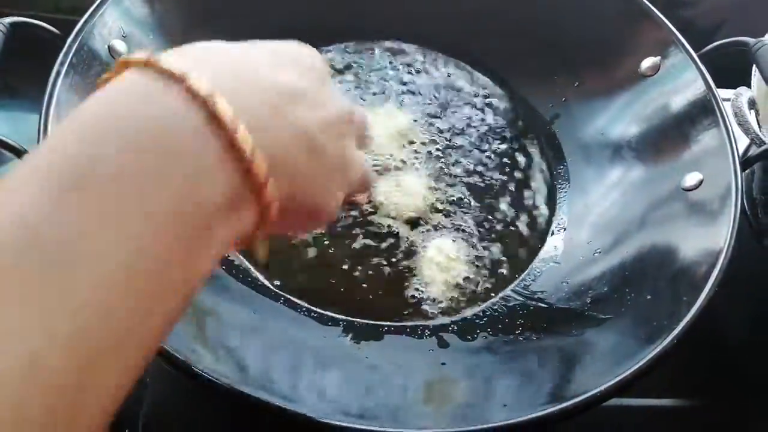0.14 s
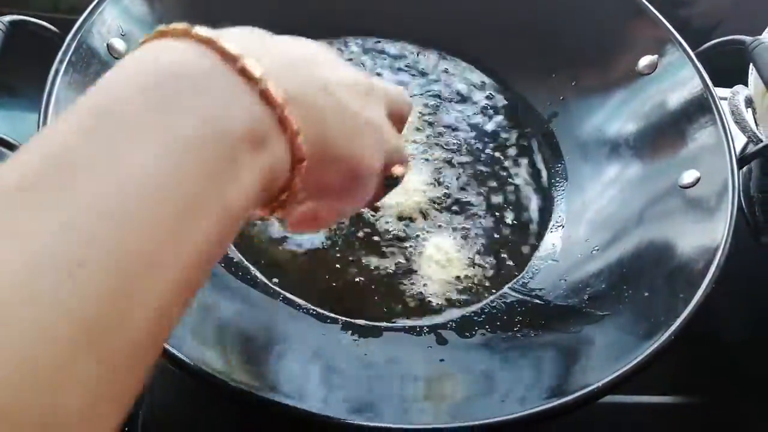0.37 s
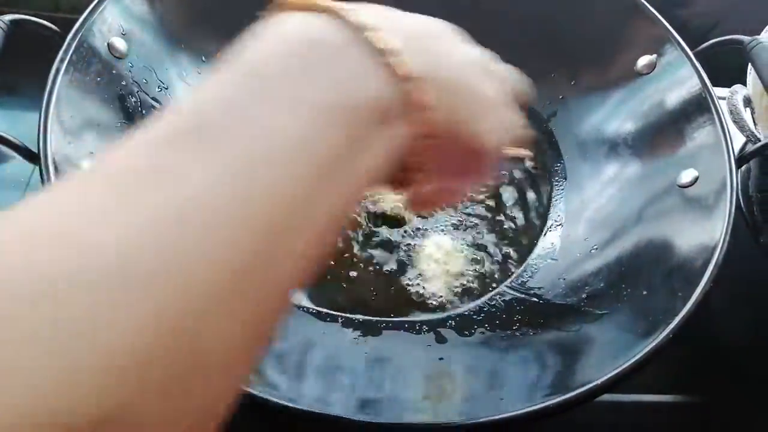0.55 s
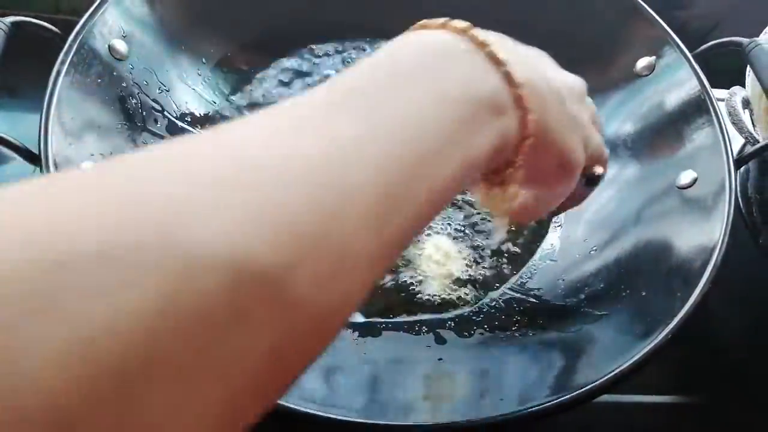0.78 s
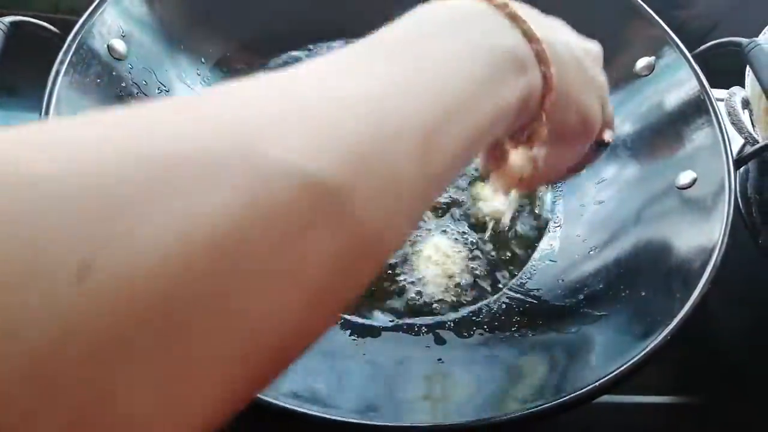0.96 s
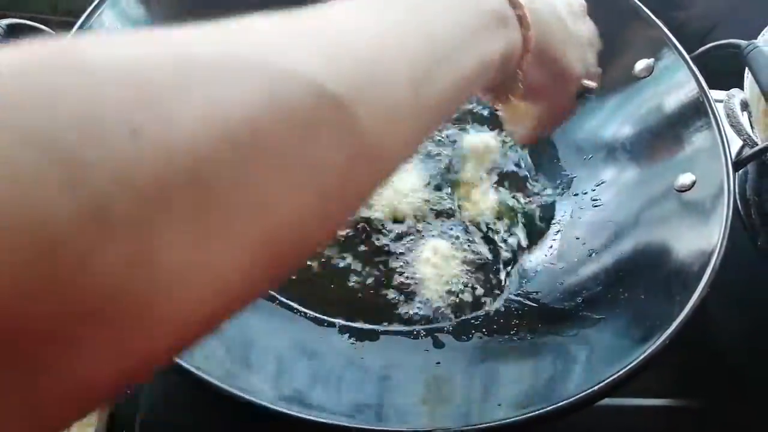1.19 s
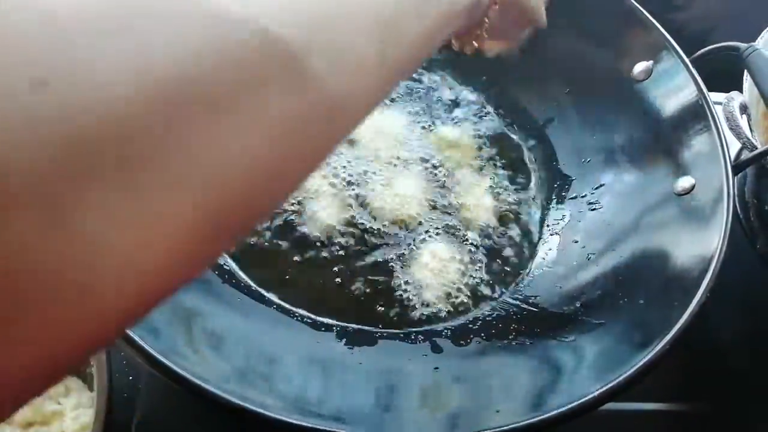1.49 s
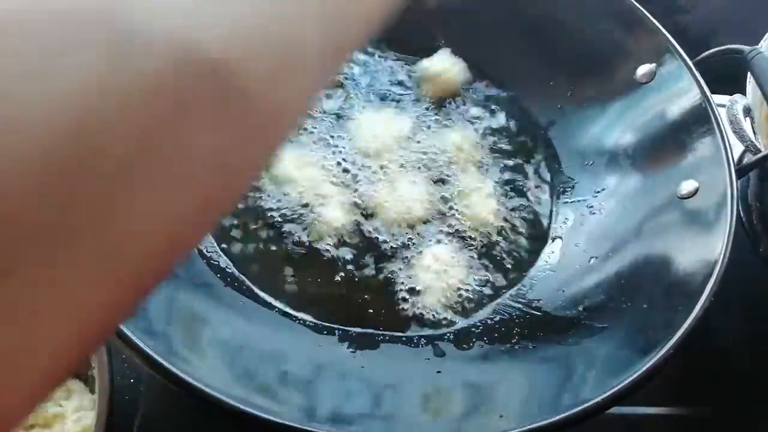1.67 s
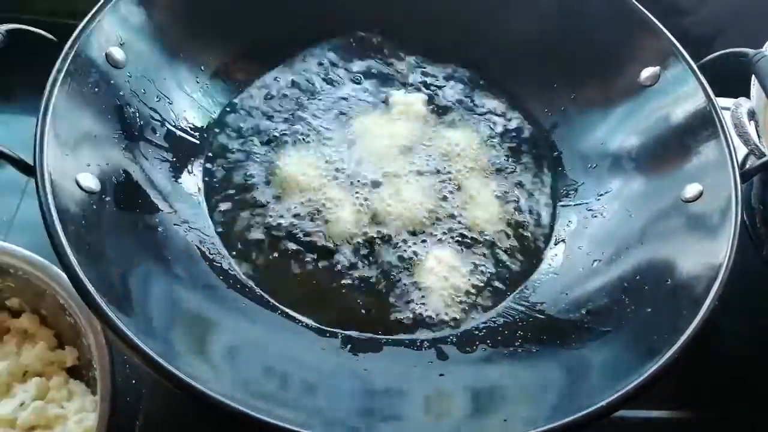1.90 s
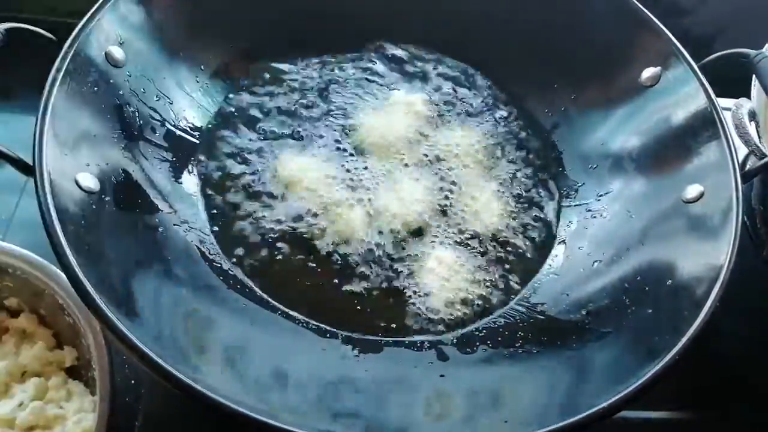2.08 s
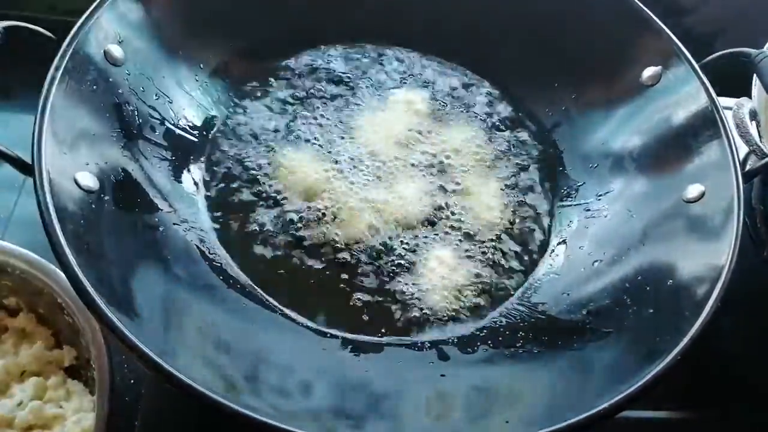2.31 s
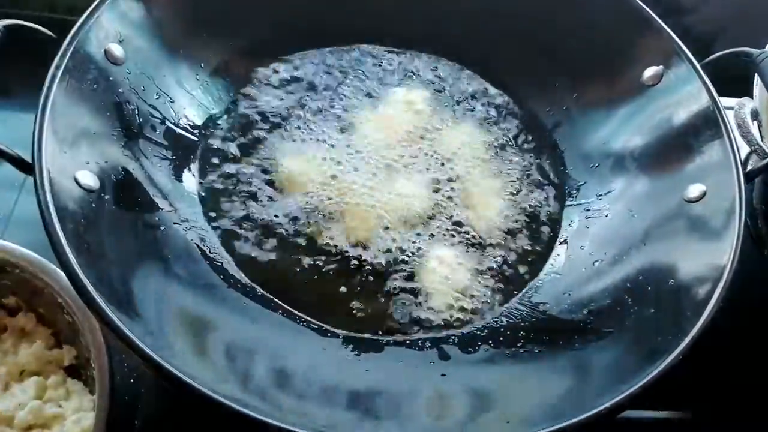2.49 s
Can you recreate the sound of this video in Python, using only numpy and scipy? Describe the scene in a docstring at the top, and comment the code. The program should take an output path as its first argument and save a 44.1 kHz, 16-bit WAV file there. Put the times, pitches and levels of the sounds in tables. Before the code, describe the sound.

Batter deep-fries with a continuous sizzle and crisp crackle, heard close to the wok in a small kitchen. Droplets spit and bubbles pop throughout, and a frothy hiss rises in the second half as fresh batter heats up.

```python
"""In a small kitchen, lumps of batter fry close by in a wok of hot oil. Countless tiny bubbles burst, each a
damped oscillator; their sum is a steady sizzle and crackle, joined by a swelling fizz and froth as fresh batter
heats up. Water droplets spit as they flash to steam, larger steam bubbles pop and ring at their resonance, and
a few dull plops sound over the faint churning of the oil. Each layer sounds with its own colour, different on
left and right, and the room adds its reverberation."""
import sys
import numpy as np
from scipy import signal
from scipy.fft import rfft, irfft
from scipy.io import wavfile
from scipy.ndimage import uniform_filter1d

SR = 44100
rng = np.random.default_rng(int(sys.argv[2]) if len(sys.argv) > 2 else 0)


def inscribe(sig):
    """Save sig as 16-bit PCM at rate SR to the path in sys.argv[1].

    A 1-D sig is mono; a 2-D sig holds one channel per row.
    Samples are clipped to [-1, 1] before scaling.
    """
    pcm = np.round(np.clip(np.atleast_2d(sig).T, -1, 1) * 32767)
    wavfile.write(sys.argv[1], SR, pcm.astype(np.int16))


N = 116865
CUTOFF_HZ = 15750


def amp(db):
    """Decibels to amplitude ratio."""
    return 10 ** (np.asarray(db) / 20)


def unit_energy(x):
    """Normalises each channel to energy 1."""
    return x / np.sqrt(np.sum(x ** 2, -1, keepdims=True) + 1e-20)


def unit_rms(x):
    """Normalises to rms 1."""
    return x / np.sqrt(np.mean(x ** 2) + 1e-20)


def envelope(levels):
    """Gain over time, interpolated between rows of time_s, level_db."""
    return amp(np.interp(np.arange(N) / SR, *np.transpose(levels)))


def add(mix, start_s, sound, level_db, pan_db, window_s=0.01):
    """Mixes in a sound; level_db is the rms that energy 1 has when spread over window_s."""
    gains = amp([[level_db + pan_db / 2], [level_db - pan_db / 2]]) * np.sqrt(window_s * SR)
    part = mix[:, round(start_s * SR):][:, :sound.shape[1]]
    part += (sound * gains)[:, :part.shape[1]]


def colour(x, spectrum):
    """Minimum-phase filter from rows of frequency_hz and gain_db (one gain, or one per channel)."""
    hz, *gains_db = np.transpose(spectrum)
    log_hz = np.log(np.abs(np.fft.fftfreq(2048, 1 / SR)) + 1)
    log_gain = np.log(amp([np.interp(log_hz, np.log(hz), db) for db in gains_db]))
    response = np.exp(np.conj(signal.hilbert(log_gain)))
    return signal.oaconvolve(x, np.fft.ifft(response).real, axes=1)[:, :N]


def echoes(decay_s, build_s, length_s):
    """Diffuse reflections: noise that builds up and decays exponentially, different in each channel."""
    t = np.arange(0, length_s, 1 / SR)
    noise = rng.standard_normal((2, len(t)))
    return unit_energy(noise * np.exp(-t / decay_s) * (1 - np.exp(-t / build_s)))


def kitchen(x, t60_s=0.53):
    """Reverberation: convolution with the room's impulse response."""
    tail = echoes(t60_s / np.log(1000), build_s=0.0038, length_s=0.5)
    return signal.fftconvolve(np.atleast_2d(x), tail, axes=1)[:, :x.shape[-1]]


def burst(t, hz, cycles):
    """A wave packet that swells and dies: the fewer its cycles, the wider its band."""
    age = t * hz / cycles
    return age ** 2 * np.exp(-age) * np.sin(2 * np.pi * hz * t)


def surge(depth_db, fastest_hz):
    """Amplitude modulation: slow sines of random phase sum to irregular swells."""
    t = np.linspace(0, N / SR, N // 64)
    rates_hz = np.geomspace(fastest_hz / 6, fastest_hz, 16)[:, None]
    swell = unit_rms(np.sin(2 * np.pi * (rates_hz * t + rng.random((16, 1)))).sum(0))
    return np.interp(np.arange(N) / SR, t, amp(depth_db * swell))


def bubbles(per_s, ring_s, spread_db, pitches=32):
    """A Poisson process of bursting bubbles, each a damped sine; most are weak, a few strong."""
    out, t = np.zeros((2, N)), np.arange(256) / SR
    strength = amp(spread_db * np.minimum(rng.exponential(1, N), 4.1))
    bursting = rng.random(N) < per_s / SR
    pitch_index = rng.integers(0, pitches, N)
    # bubbles of like size come in clusters: four neighbouring pitches swell together
    clusters = [surge(depth_db=2.5, fastest_hz=22) for _ in range(pitches // 4)]
    for k in range(pitches):
        hz = (k + 0.5) / pitches * CUTOFF_HZ
        rings = np.exp(-t / ring_s) * np.sin(2 * np.pi * (hz * t + rng.random((2, 1))))
        onsets = np.flatnonzero(bursting & (pitch_index == k))
        gain = (strength[onsets] * clusters[k // 4][onsets])[:, None]
        samples = onsets[:, None] + np.arange(len(t))
        out += [np.bincount(samples.ravel(), (gain * ring).ravel(), N)[:N] for ring in rings]
    return out


def frying(crowd, spectrum, levels, room_db):
    """Source and filter: a crowd of bubbles and its reverberation, shaped by a spectrum of its own in each
    channel."""
    direct = crowd * surge(depth_db=0.5, fastest_hz=18)
    heard = colour(direct + amp(room_db) * kitchen(direct), spectrum)
    return unit_rms(heard) * envelope(levels)


# spectrum of the steady sizzle: frequency_hz, left_db, right_db
SIZZLE_SPECTRUM = [(123, -51, -17), (330, -21, -35.5), (610, -3.5, -8), (770, -5.5, -19),
                   (1424, -7.5, -0.5), (1750, -11, -4.5), (2300, -1.5, 0.5), (4030, -4.5, -10),
                   (4470, -4.5, 2.5), (6000, -2.5, -3.5), (7300, -14, 4.5), (7720, 2.5, -7.5),
                   (8500, 1.5, 0), (9500, -1.5, -11.5), (10100, -6.5, -12.5), (12300, -12, -8.5),
                   (13600, -14, -10.5), (15300, -6, -8.5)]
# its envelope: time_s, level_db
SIZZLE_LEVEL = [(0, -44.5), (.29, -45.5), (.335, -47.5), (.43, -43.5), (.55, -42), (.66, -46), (.76, -44),
                (.88, -43.5), (.97, -44), (1.1, -43), (1.21, -44.5), (1.45, -43.5), (2, -45), (2.65, -42.5)]


def sizzle():
    """Superposition: thousands of tiny bursts a second merge into a steady noise."""
    crowd = bubbles(per_s=5000, ring_s=0.00027, spread_db=4)
    return frying(crowd, SIZZLE_SPECTRUM, SIZZLE_LEVEL, room_db=0.5)


# spectrum of the crisp crackle: frequency_hz, gain_db
CRACKLE_SPECTRUM = [(1000, -56), (3500, -12), (5000, -2), (6800, -5), (9000, 6.5), (11000, -5), (15000, -4)]
# its envelope: time_s, level_db
CRACKLE_LEVEL = [(0, -49), (.35, -56.5), (1.2, -54.5), (1.9, -50.5), (2.65, -51.5)]


def crackle():
    """Sparse impulses: heavily damped bubbles stand out as single clicks, in flurries."""
    clicks = bubbles(per_s=170, ring_s=0.000093, spread_db=2.4, pitches=12)
    flurries = surge(depth_db=3.5, fastest_hz=24)
    return frying(clicks * flurries, CRACKLE_SPECTRUM, CRACKLE_LEVEL, room_db=-24)


# treble passing the cook's arm: time_s, gain_db
ARM_SHADE = [(0, 3), (.28, 0), (.36, -5.5), (.8, -4), (1.1, -1.5), (1.4, 0), (2, -5.5), (2.65, -3.5)]


def arm_shadow(x, corner_hz=9400):
    """Acoustic shadow: the arm over the wok shades short waves, while long ones diffract round it."""
    hz = np.fft.rfftfreq(N, 1 / SR) + 1
    treble = irfft(rfft(x) / (1 + (corner_hz / hz) ** 8), N)
    return x + treble * (envelope(ARM_SHADE) - 1)


# spectrum of the fresh batter's fizz: frequency_hz, left_db, right_db
FIZZ_SPECTRUM = [(245, -26.5, -17), (590, -3, -13.5), (1410, -14, -6.5), (1850, -12, -9), (3400, 1, -6.5),
                 (3950, -7, -2), (4500, -11.5, 3.5), (5300, 1, -1), (6200, -22, -4.5), (7000, 2, 6),
                 (7870, -13, -1.5), (8400, 8.5, -17), (8840, -3, -26), (10300, -11.5, -12.5),
                 (15200, -15, -10)]
# its envelope: time_s, level_db
FIZZ_LEVEL = [(0, -49), (1.2, -67), (1.62, -45.5), (1.78, -49), (1.92, -43.5), (2.04, -43), (2.24, -39),
              (2.36, -44.5), (2.65, -46.5)]


def fizz():
    """Shot noise of dense, even bubbles: it ebbs, then swells as fresh batter heats up."""
    crowd = bubbles(per_s=7000, ring_s=0.00037, spread_db=2.5)
    return frying(crowd, FIZZ_SPECTRUM, FIZZ_LEVEL, room_db=-8)


# spectrum of the churning oil and kitchen rumble: frequency_hz, gain_db
RUMBLE_SPECTRUM = [(20, 3), (50, -1), (82, -8), (100, 9.5), (122, -6), (165, 4.5), (230, -3.5), (360, -1),
                   (580, -1.5), (900, -3.5), (1600, -22), (3000, -18)]
# its envelope: time_s, level_db
RUMBLE_LEVEL = [(0, -62.5), (.4, -60.5), (.52, -59), (.85, -58), (1.2, -62.5), (1.7, -61.5), (2.2, -61),
                (2.65, -65.5)]


def rumble():
    """Filtered noise: the random churning of the oil lies faintly under the sizzle."""
    noise = rng.standard_normal((2, N))
    return unit_rms(colour(noise, RUMBLE_SPECTRUM)) * envelope(RUMBLE_LEVEL)


# exploding droplets: start_s, pitch_hz, level_db, pan_db (left minus right), decay_s
SPITS = [(0.04, 10900, -53, -6, 0.0013), (0.049, 9500, -46, 3, .002), (0.1717, 6000, -41, 2, 0.0002),
         (0.247, 6530, -40, 0, 0.007), (0.42, 7300, -43, 6, 0.01), (0.44, 6200, -45.5, 0, 0.00015),
         (0.545, 5300, -44.5, 4, 0.0042), (0.576, 7100, -38, -4, 0.0093), (0.584, 8500, -45, 7, 0.00032),
         (0.754, 7400, -49.5, -12, 0.0034), (0.77, 7500, -44, 1, 0.0055), (0.932, 5100, -47, -5, 0.00048),
         (0.959, 6700, -38.5, -3, 0.015), (1.045, 6200, -46, 0, 0.00056), (1.087, 5830, -39, -6.5, 0.0081),
         (1.221, 5570, -52, 5, .0006), (1.275, 8400, -42.5, 2, 0.0064), (1.652, 9500, -42, 4, 0.00053),
         (1.7375, 8000, -46, 0, .0002), (1.7648, 7900, -39, -2, 0.0015), (1.901, 8500, -51, 13, 0.00029),
         (1.923, 8400, -57, 1, .001), (1.958, 8950, -38, 4, 0.0006), (2.0066, 5440, -37.5, 2, 0.0018),
         (2.094, 12100, -44, 7, 0.0011), (2.236, 7000, -42, -11, 0.0011), (2.301, 7560, -38, 2, 0.0042),
         (2.3785, 6950, -45.5, -13, 0.00076), (2.494, 6000, -43, 0, .0009), (2.498, 12200, -43, 0, 0.0015),
         (2.547, 7400, -42, -2, 0.00026), (2.638, 7000, -43.5, -3, 0.0013)]


def spits(room_db=-6.5):
    """Flash boiling: a water droplet explodes in the oil as a sharp tick or a short spurt of steam."""
    out, t = np.zeros((2, N)), np.arange(0, 0.5, 1 / SR)
    for start_s, pitch_hz, level_db, pan_db, decay_s in SPITS:
        tick = unit_energy(np.gradient(burst(t, pitch_hz, cycles=0.4)))
        spurt = echoes(decay_s, build_s=0.00005, length_s=0.04)
        crack = unit_energy(signal.fftconvolve(tick[None], spurt, axes=1)[:, :len(t)])
        tail = amp(room_db) * unit_energy(kitchen(tick))
        add(out, start_s, crack + tail, level_db, pan_db)
    return out


# steam bubbles; rows that start together form one cluster:
# start_s, pitch_hz, level_db, pan_db, ring_s, room_db, purity (the tone's share of energy, 0-1)
STEAM_POPS = [(0.183, 4400, -43.5, -3, 0.011, -8, 0), (0.3623, 2590, -29, 1, 0.02, -2.5, 0.06),
              (0.361, 3160, -46, 13, 0.0025, 10.5, 0.16), (0.363, 4450, -41.5, 1, 0.0089, -4, 0.05),
              (0.5773, 3400, -25, 10.5, 0.01, -5.5, 0.1), (0.5789, 2900, -31, 8, 0.0075, -0.5, 0.23),
              (.578, 4350, -40, -3, 0.02, -4, 0.4), (.593, 3558, -33.5, 10, 0.028, -9, 0.46),
              (1.0225, 3570, -35, 2, 0.02, -1.5, 0.12), (1.023, 2700, -44, 1, 0.022, 5, 0),
              (1.023, 4500, -47, -9, 0.046, 9, 0.17), (1.056, 3080, -33, 6.5, 0.016, -3, 0.01),
              (1.261, 4470, -39, -8, 0.017, 2.5, 0.38), (1.26, 3800, -45, 7, 0.0093, 5.5, 0),
              (1.381, 4410, -45, -10, 0.005, 5, 0.08), (1.4151, 2230, -32.5, 3, 0.015, -8.5, 0.52),
              (1.418, 2694, -35.5, -3, 0.022, -1, 0.09), (1.4184, 4360, -38, -3, 0.014, -15, 0.5),
              (1.553, 4500, -40.5, -4, 0.01, -2, 0), (1.609, 2130, -42, -4, .003, 1.5, 0.03),
              (1.61, 3270, -45.5, 0, .005, 2, 0), (1.6641, 4306, -32, -1, 0.017, -1.5, .15),
              (1.665, 3950, -39.5, 7, 0.0077, -5, 0.26), (1.6633, 3360, -38, 8, 0.0098, -0.5, 0.05),
              (1.685, 2210, -45.5, -12, 0.046, 3.5, 0), (1.866, 4520, -41, -8, 0.0035, 2, .3),
              (2.007, 3400, -41.5, 3, 0.0083, -5, 0), (2.081, 4500, -45, -5, 0.0057, 4, .2),
              (2.1112, 4480, -36, -3, 0.01, -7, 0.4), (2.113, 3600, -41.5, 7, .008, 1, 0),
              (2.182, 4400, -40.5, -4, 0.025, -4, .3), (2.281, 4450, -42, -6, 0.0053, -14, .5)]


def pops(attack_s=0.0013, pitch_rise=0.018):
    """Resonance: a steam bubble bursts and rings; the bowl scatters the sound and the room holds it."""
    out, t = np.zeros((2, N)), np.arange(0, 0.5, 1 / SR)
    for start_s, pitch_hz, level_db, pan_db, ring_s, room_db, purity in STEAM_POPS:
        decay = np.exp(-t / ring_s)
        ring = decay * (1 - np.exp(-t / attack_s))
        cycles = (0.89 + 3.5 * purity) * (pitch_hz / 2970) ** 0.39  # more for small, high bubbles
        kick = unit_energy(burst(t, pitch_hz, cycles))
        noise = rng.standard_normal((2, len(t)))
        wash = irfft(rfft(noise) * rfft(kick), len(t))
        wash_rms = np.sqrt(uniform_filter1d(wash ** 2, size=280) + 1e-12)
        scatter = np.sqrt(1 - purity) * unit_energy(ring * wash / wash_rms)
        glide_hz = pitch_hz * (1 + pitch_rise * (1 - decay))  # rises as the bubble surfaces
        tone = np.sqrt(purity) * unit_energy(ring * np.sin(2 * np.pi * np.cumsum(glide_hz) / SR))
        tail = unit_energy(kitchen(kick + 0.84 * tone))
        add(out, start_s, unit_energy(tone + scatter), level_db, pan_db)
        add(out, start_s, tail, level_db + room_db, 0.36 * pan_db)
    return out


# dull plops in the oil: start_s, pitch_hz, level_db, room_db
PLOPS = [(.569, 1120, -59, -15), (.632, 347, -62, 7), (1.485, 920, -55.5, -1), (1.72, 330, -63.5, 6),
         (2.181, 683, -53.5, 7), (2.199, 604, -46, -2), (2.2, 1350, -51.5, 2), (2.244, 617, -55, -1),
         (2.392, 710, -52.5, 2.5), (2.3925, 1130, -48, -5), (2.451, 590, -56.5, 0),
         (2.456, 1200, -59.5, 13)]


def plops():
    """Heavy damping: a low oscillation dies within a few cycles and leaves the room's tail."""
    out, t = np.zeros((2, N)), np.arange(0, 0.5, 1 / SR)
    for start_s, pitch_hz, level_db, room_db in PLOPS:
        plop = unit_energy(burst(t, pitch_hz, cycles=0.7))
        tail = amp(room_db) * unit_energy(kitchen(plop))
        add(out, start_s, plop + tail, level_db, pan_db=6.5)
    return out


# spectrum of the fine froth: frequency_hz, left_db, right_db
FROTH_SPECTRUM = [(1990, -42, -60), (6000, -17, -31), (7400, 6, -17), (8340, -24, 7), (8500, 13, -26),
                  (8920, 4, -12), (10800, -22, -24.5), (15000, -17, -20)]
# its envelope: time_s, level_db
FROTH_LEVEL = [(1.2, -72), (1.5, -75), (1.71, -47.5), (1.77, -43.5), (1.84, -40), (1.9, -41.5), (1.97, -46),
               (2.04, -54), (2.65, -53.5)]


def froth():
    """Small bubbles resonate high: fine froth round the newest lump swells into a narrow-band hiss."""
    crowd = bubbles(per_s=7000, ring_s=0.00037, spread_db=2.5)
    return frying(crowd, FROTH_SPECTRUM, FROTH_LEVEL, room_db=-8)


def scene():
    """Linear superposition of all sources; the arm shades only the sizzle and crackle."""
    return arm_shadow(sizzle() + crackle()) + fizz() + rumble() + spits() + pops() + plops() + froth()


# likeness of the sound at two closely spaced microphones: frequency_hz, correlation (0-1)
COHERENCE = [(30, 0.74), (200, 0.88), (600, 0.7), (1300, 0.37), (2400, 0), (5000, 0.004)]


def record(dry):
    """Spatial coherence: two close microphones share the long waves; a low-pass limits the band."""
    spectra = rfft(dry)
    hz, correlation = np.transpose(COHERENCE)
    log_hz = np.log(np.fft.rfftfreq(N, 1 / SR) + 1)
    angle = np.arcsin(np.interp(log_hz, np.log(hz), correlation)) / 2
    pair = irfft(np.cos(angle) * spectra + np.sin(angle) * spectra[::-1], N)
    low_pass = signal.firwin(511, CUTOFF_HZ, window=("kaiser", 9), fs=SR)
    return signal.oaconvolve(pair, low_pass[None], "same")


dry = scene()
out = record(dry)
inscribe(out)
```